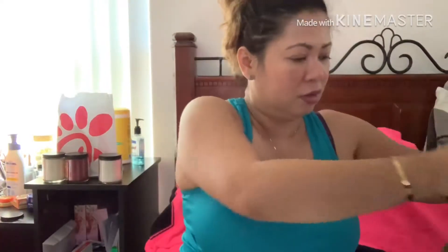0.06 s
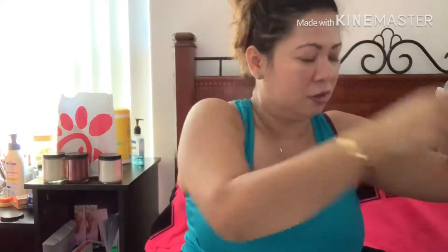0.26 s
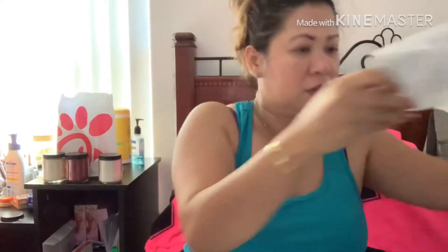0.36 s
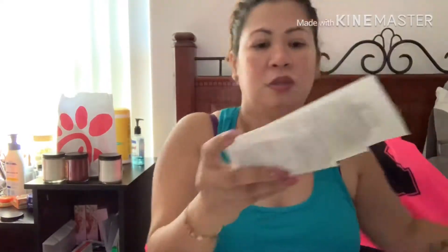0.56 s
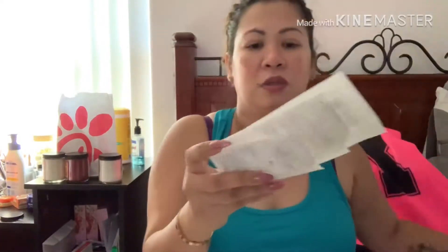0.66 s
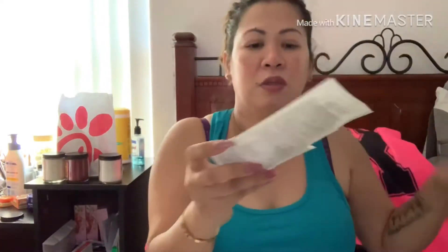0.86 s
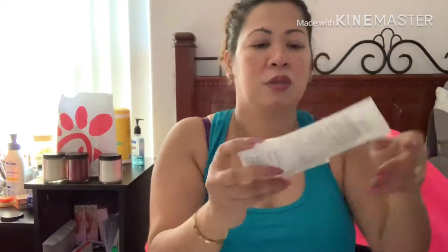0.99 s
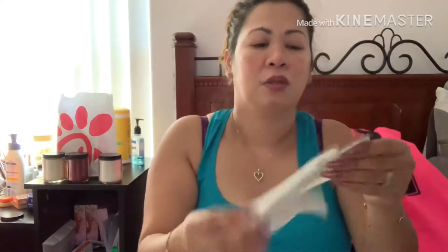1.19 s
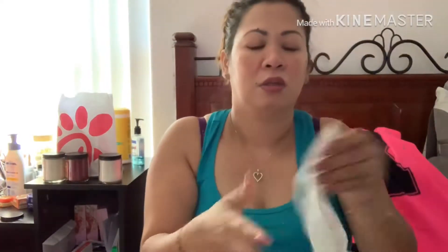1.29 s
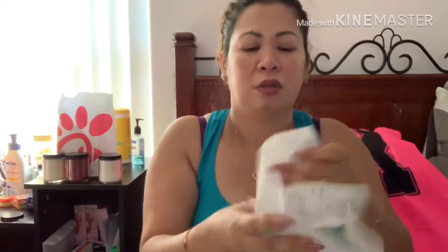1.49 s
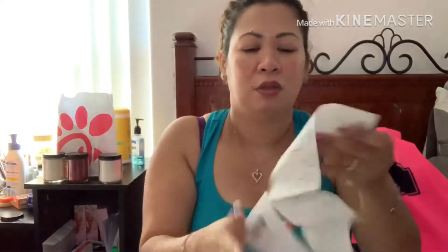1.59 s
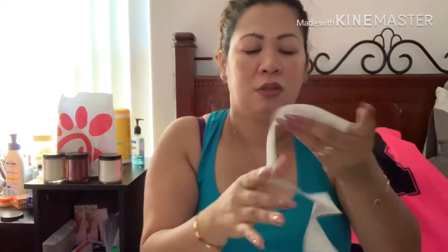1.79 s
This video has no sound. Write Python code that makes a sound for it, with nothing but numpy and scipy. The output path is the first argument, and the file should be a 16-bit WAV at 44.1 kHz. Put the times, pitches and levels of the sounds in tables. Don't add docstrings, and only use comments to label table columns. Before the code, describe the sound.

Paper crinkling, close in a small bedroom. Faint edge ticks open, then at 0.2-0.35 s stiff packing paper crackles loudly with a hollow box boom. Smaller creases and rustles follow from 0.5 to 0.85 s. After a lull around 1 s, a thin sheet unfolds, brighter and sparser, with sharp snaps near 1.5-1.56 s, then fading. Soft bedding bumps and low fan hum lie beneath; short room reflections.

```python
import sys
import numpy as np
from scipy import signal
from scipy.fft import rfft, irfft, next_fast_len
from scipy.io import wavfile
from scipy.ndimage import uniform_filter1d, map_coordinates

SR = 44100
rng = np.random.default_rng(int(sys.argv[2]) if len(sys.argv) > 2 else 0)


def to_wav(s):
    ch = np.atleast_2d(s).T
    pcm = np.round(np.clip(ch, -1, 1) * 32767)
    wavfile.write(sys.argv[1], SR, pcm.astype(np.int16))


def amplitude_ratio(level_db):
    exponent = np.asarray(level_db, float) / 20
    return 10 ** exponent


N = 81585


def unit(x):
    return x / np.sqrt(np.mean(x ** 2) + 1e-20)


def along(points, hz):
    f, v = np.transpose(points)
    return np.interp(np.log(hz + 1), np.log(f + 1), v)


def wobble(rate):
    knots = rng.standard_normal(int(N * rate / SR) + 4)
    return map_coordinates(knots, [np.arange(N) * rate / SR])


def filtered(x, response):
    m = next_fast_len(x.shape[-1] + 8192)
    spectrum = rfft(x, m) * response(np.fft.rfftfreq(m, 1 / SR))
    return irfft(spectrum, m)[..., :x.shape[-1]]


def peak(f, hz, width):
    return 1j * f * width / (hz * hz - f * f + 1j * f * width + 1e-9)


def evened(x, width_hz):
    z = rfft(x)
    bins = int(width_hz * x.shape[-1] / SR) + 1
    smooth_power = uniform_filter1d(np.abs(z) ** 2, size=bins)
    return irfft(z / np.sqrt(smooth_power + 1e-20), x.shape[-1])


def creases(table, rise_s):
    lead_in_s, lead_in_db = .003, -30
    spike_db = 4
    wide, wide_hz = 0.49, 1500
    flap, flap_db, flap_lag = .4, -5, 2.5
    out, ahead = np.zeros(N + SR), SR // 50
    t = np.arange(-ahead, SR // 8) / SR
    after = np.maximum(t, 0)
    for s, db, hz, t60, crack_db in table:
        scatter = uniform_filter1d(rng.standard_normal(len(t)), size=9) * 1.5
        clicks = rng.standard_normal(len(t)) * amplitude_ratio(spike_db * scatter)
        shape = amplitude_ratio(-60 * after / max(t60, .002)) * (1 - np.exp(-after / rise_s))
        buckling = evened(clicks * shape, 500) * np.linalg.norm(clicks * shape)
        lead_in = clicks * amplitude_ratio(lead_in_db) * np.exp(-np.abs(t) / lead_in_s)
        give = np.where(t > 0, buckling, lead_in)

        def ring(f):
            sheet = peak(f, hz, wide * np.sqrt(hz * wide_hz))
            late = np.exp(-2j * np.pi * f * flap_lag / hz)
            panel = amplitude_ratio(flap_db) * late * peak(f, flap * hz, flap * hz / 2)
            crack = amplitude_ratio(crack_db) * peak(f, 2800, 22300)
            return sheet - panel + crack

        burst = filtered(give, ring)
        out[round(s * SR):][:len(t)] += amplitude_ratio(db) * burst / np.abs(burst).max()
    return out[ahead:ahead + N]


def packing_paper():
    # t/s, peak level/dB, sheet pitch f/Hz, t60/s, crack level/dB
    packing = [(.219,-20,1350,0.013,-19),(.231,-26.5,1224,.02,-21),(.243,-16,1730,0.018,-13),(.2475,-18,1500,0.039,-13.5),(.265,-24,2500,0.015,-18),(.278,-8,1290,0.031,-12),(.285,-7,1860,0.026,-5),(.29,-4.5,1255,0.0085,-13),(.295,-19.5,1160,0.033,-28),(.302,-13.5,1420,0.02,10),(.312,-33,2020,0.018,5),(.325,-31,1500,0.026,-8),
               (.344,-29.5,2700,0.032,-22),(.376,-24.5,2340,0.031,-9),(.506,-20.5,1520,0.024,-16),(.515,-26.5,1800,0.068,-10),(.533,-31.5,1800,0.058,1),(.548,-45,1350,0.033,-19),(.5605,-23.5,1610,0.025,-51),(.567,-31,1070,0.013,-33),
               (.598,-36.5,1730,0.02,-34),(.612,-34,6500,0.027,-8),(.638,-33,2500,.03,-13),(.65,-27.5,1580,0.014,-31),(.669,-23,1890,0.025,-20),(.683,-28.5,1940,0.097,-16),
               (.7,-38,1170,0.051,12),(.713,-23.5,1610,0.12,-19),(.722,-17.5,1170,0.018,-17),(.733,-27,1960,0.046,-18),(.748,-40,1500,0.056,-10),
               (.7697,-22,1500,0.024,-24.5),(.787,-26.5,1060,0.025,-22),(.811,-20,6160,0.016,-25),(.8115,-29,1950,0.0086,-22),(.818,-21.5,2660,0.021,-23),(.827,-27,1440,0.012,-35),(.843,-49,1500,0.12,-12)]
    return creases(packing, .0013)


def box_boom(snaps):
    # f/Hz, width/Hz, level/dB
    cavity = [(123, 140, 2.5), (227.5, 39, 11), (285, 24, 6), (487, 89, 6)]
    boom_db = 9.5

    def modes(f):
        return sum((-1) ** k * amplitude_ratio(db) * peak(f, hz, width) for k, (hz, width, db) in enumerate(cavity))

    return amplitude_ratio(boom_db) * filtered(snaps, modes)


def loose_edges():
    # t/s, peak level/dB, sheet pitch f/Hz, t60/s, crack level/dB
    edge_ticks = [(0.0064, -36.5, 3230, 0.0035, 4), (0.0203, -29.5, 2320, 0.018, -8),
                  (0.0362, -36, 2290, 0.0083, -18), (0.0482, -28, 8300, 0.006, -15),
                  (0.0585, -37, 2090, 0.015, 23), (0.0691, -29, 7100, 0.02, -13),
                  (0.0833, -22, 13200, 0.013, -50), (0.2142, -24, 1780, 0.028, -5),
                  (0.268, -8, 9600, 0.051, -7), (0.4397, -29, 2590, 0.0037, 29),
                  (0.4946, -30, 1690, 0.0041, 26), (0.855, -28.5, 3450, 0.0048, -4),
                  (0.8758, -31, 2490, 0.011, 13)]
    return creases(edge_ticks, .0007)


def thin_sheet():
    # t/s, peak level/dB, sheet pitch f/Hz, t60/s, crack level/dB
    sheet_folds = [(0.9508, -39.5, 1400, 0.011, -10), (1.0794, -25.5, 6500, 0.0028, -5),
                   (1.1368, -25, 3000, 0.0015, -12), (1.1411, -20.5, 1490, 0.024, -11),
                   (1.1514, -25.5, 2290, 0.0097, 0), (1.1732, -34, 2100, 0.0071, 14),
                   (1.2136, -35, 1610, 0.035, -15), (1.2284, -28, 1460, 0.008, -19.5),
                   (1.2405, -30, 2040, 0.01, -20), (1.2462, -21, 2870, 0.02, 2),
                   (1.2665, -38, 1540, 0.0052, -15), (1.3597, -40, 6240, 0.014, -19),
                   (1.3708, -31.5, 1620, 0.047, 1), (1.4332, -29, 12300, 0.019, 2),
                   (1.4544, -26, 6430, 0.028, 16), (1.5048, -11.5, 5400, 0.008, -11),
                   (1.511, -30, 1330, 0.06, -10), (1.5474, -21.5, 2900, 0.081, -6),
                   (1.5558, -7, 1890, 0.0052, -23), (1.5635, -29, 1980, 0.017, 7),
                   (1.6129, -26.5, 6040, 0.052, -35), (1.6502, -37.5, 1900, 0.024, -9),
                   (1.724, -31.5, 2670, 0.017, -10), (1.743, -38, 4220, 0.014, 7)]
    thin_hz = 300
    return filtered(creases(sheet_folds, .0007), lambda f: (1j * f / (thin_hz + 1j * f)) ** 2)


def grains(spectrum):
    grains_a_second, grain_db, clump_db = 7000, 1.8, 2
    struck = rng.random(N) < grains_a_second / SR
    ticks = struck * rng.standard_normal(N) * amplitude_ratio(grain_db * rng.exponential(size=N))
    clumps = amplitude_ratio(clump_db * (wobble(24.21) + wobble(90)))
    return unit(filtered(ticks * clumps, lambda hz: amplitude_ratio(along(spectrum, hz))))


def rustle():
    # t/s, effort level/dB, weight of the paper moved level/dB
    hands = [(0, -60.5, -2.5), (.1, -73, 10.5), (.19, -67, -22), (0.303, -40, -11), (0.401, -54.5, 3.5),
             (0.483, -65, 5.5), (0.531, -53, 3), (0.741, -50, -4), (.86, -64.5, 7), (.93, -59.5, -6),
             (1.06, -95, 8), (1.16, -57, -6), (1.271, -46.5, -14), (1.342, -59.5, -13), (1.45, -50, -13),
             (1.6, -48, -18), (1.721, -55.5, -16.5), (1.85, -78, 4)]
    # f/Hz, level/dB per Hz
    crisp = [(290, -61), (500, -59), (614, -16), (1090, 2), (5840, 9), (10600, 3.5), (12100, 3.5),
             (15800, 4), (16500, -35)]
    # f/Hz, level/dB per Hz
    heavy = [(71, 1), (120, 8), (393, 6.5), (504, 14.5), (618, 8), (1630, 3), (2640, -5.5), (5000, -48),
             (6500, -57), (11000, -120)]
    crisp_db, heavy_db = 3.5, 7
    s, effort, weight = np.transpose(hands)
    t = np.arange(N) / SR
    effort_db, weight_db = np.interp(t, s, effort), np.interp(t, s, weight)
    fine = amplitude_ratio(crisp_db) * grains(crisp)
    stiff = amplitude_ratio(heavy_db + weight_db) * grains(heavy)
    return amplitude_ratio(effort_db) * (fine + stiff)


def bumps():
    # t/s, peak level/dB, pitch f/Hz
    thuds = [(0.04, -45.5, 61.6), (0.068, -37, 255), (0.238, -27, 213), (0.285, -22.5, 126),
             (.246, -32, 280), (.51, -61, 398), (0.567, -29, 486), (.7225, -24, 527), (1.142, -36, 640),
             (1.5572, -20.5, 718), (0.725, -33, 92), (0.743, -42, 236), (0.834, -39, 93),
             (1.024, -42.5, 148), (1.234, -41, 131), (1.373, -42.5, 105), (1.772, -51, 170)]
    cycles = 2.37
    out = np.zeros(N + SR)
    for s, db, hz in thuds:
        u = np.arange(int(cycles * 3 * SR / hz)) * hz / SR / cycles
        swell = 3 * u * np.exp(1 - 3 * u)
        out[round(s * SR):][:len(u)] += amplitude_ratio(db) * swell * np.sin(2 * np.pi * cycles * u * (1 - 0.01 * u))
    return out[:N]


def placed(x, lead_s, pan_db, shadow_db):
    # f/Hz, side level/dB
    shadow = [(300, -21), (1500, -40), (3000, -10.5), (8000, -5), (15000, 7.5)]
    shadow_s = .00013
    blur_hz = 2000
    ports = np.array([[1], [-1]])

    def reach(hz):
        lead = np.exp(1j * np.pi * hz * lead_s * ports / np.hypot(1, hz / blur_hz))
        differ = amplitude_ratio(along(shadow, hz) + shadow_db) * np.exp(-2j * np.pi * hz * shadow_s) * 1j
        return lead + ports * differ

    return filtered(x * amplitude_ratio(pan_db / 2 * ports), reach)


def spread(pair):
    # f/Hz, left-right likeness
    alike = [(100, 0.95), (400, 0.65), (1500, 0.25), (4000, 0.012)]

    def turned(hz):
        turn = np.arccos(np.clip(along(alike, hz), -1, 1)) / 2
        return np.array([np.cos(turn), np.sin(turn)])

    mid, side = filtered(pair, turned)
    return np.array([mid + side, mid - side])


def room(x):
    # f/Hz, t60/s
    decay = [(200, 0.195), (2000, 0.15), (10000, 0.16)]
    tail_db, wall_s, wall_db = -7.5, .0085, -13
    out, step = np.zeros((2, N + SR)), SR // 5
    fade = amplitude_ratio(-60 * np.arange(SR // 3) / SR / 0.18)
    for k in range(0, N, step):
        noise = evened(rng.standard_normal((2, SR // 3)) * fade, 138)
        hz, t, z = signal.stft(noise, SR, nperseg=256)
        z = z * amplitude_ratio(-60 * t * (1 / along(decay, hz)[:, None] - 1 / 0.178))
        tail = signal.istft(z, SR, nperseg=256)[1]
        wet = signal.fftconvolve(x[None, k:k + step], tail / np.linalg.norm(tail[0]), axes=1)
        out[:, k + 130:k + 130 + wet.shape[1]] += wet
    wall = np.pad(x, (round(wall_s * SR), 0))[:N]
    return amplitude_ratio(tail_db) * spread(out[:, :N]) + amplitude_ratio(wall_db) * wall


def air():
    # f/Hz, level/dB per Hz
    tone_color = [(20, -9), (40, -2), (200, -6.5), (330, -14), (500, -10.5), (900, -20), (5000, -27),
                  (16500, -37.5)]
    # f/Hz, width/Hz, level/dB
    fan = [(69, 42, -63), (155.8, 110, -53.5), (309, 270, -65.5)]
    # f/Hz, level/dB
    motor = [(182, -67), (392, -71), (441, -66)]
    tone_db, swell_db = -54.5, 1.5
    tone = unit(filtered(spread(rng.standard_normal((2, N))), lambda hz: amplitude_ratio(along(tone_color, hz))))
    hums = np.zeros(N)
    for hz, width, db in fan:
        rumble = unit(filtered(rng.standard_normal(N), lambda f: peak(f, hz, width) ** 2))
        hums += amplitude_ratio(db + swell_db * wobble(7.24)) * rumble
    for hz, db in motor:
        phase = 2 * np.pi * np.cumsum(hz + 2 * wobble(8)) / SR
        hums += amplitude_ratio(db + 2 * wobble(3)) * np.sin(phase)
    return amplitude_ratio(tone_db + 0.54 * wobble(7.0)) * tone + hums


def scene():
    box_out_s = 0.94
    sheet_dry_db = -2
    inside = 1 / (1 + np.exp((np.arange(N) / SR - box_out_s) / .02))
    bed, snaps = rustle(), packing_paper()
    boxed = loose_edges() + snaps + box_boom(snaps) + inside * bed
    front = thin_sheet() + (1 - inside) * bed
    direct = placed(boxed, .00015, -.5, -12) + placed(front, 0, -1.2, 0)
    return direct + room(boxed + amplitude_ratio(sheet_dry_db) * front) + bumps() + air()


def starved(x):
    # from f/Hz, to f/Hz, share of frames, part (0 mid, 1 side)
    weak_bands = [(10100, 11000, .35, 0), (13700, 15000, .55, 0), (15900, 16800, .88, 0),
                  (11900, 12900, .6, 1), (15300, 16800, .8, 1)]
    # f/Hz, level/dB
    side_comb = [(5000, 0), (7000, 2), (9000, -3), (10500, 5), (12400, -9), (14200, 4), (15200, 2),
                 (15700, -10)]
    hz, _, z = signal.stft(np.array([x[0] + x[1], x[0] - x[1]]) / 2, SR, nperseg=1024)
    z[1] *= amplitude_ratio(along(side_comb, hz))[:, None]
    power = np.abs(z) ** 2
    whole = power[:, hz > 1000].sum((0, 1))
    for lo, hi, share, part in weak_bands:
        band = (hz > lo) & (hz < hi)
        margin = np.log(power[part, band].sum(0) ** 0.83 / whole + 1e-30)
        margin = uniform_filter1d(margin, size=2)
        margin = margin - .9 * uniform_filter1d(margin, size=15)
        z[part, band] *= margin > np.quantile(margin, share)
    mid, side = signal.istft(z, SR, nperseg=1024)[1][:, :N]
    return np.array([mid + side, mid - side])


def band_limit(x):
    return signal.sosfilt(signal.butter(12, 16800, fs=SR, output="sos"), x)


def record(dry):
    # f/Hz, level/dB
    mic = [(60, 1.5), (3000, 1), (7000, -1), (9000, -0.5), (10500, -4.5), (12500, 5), (14200, -10.5),
           (15700, 0.5)]
    ceiling = .6
    top_hz, top_db, end_hz = 15900, -12, 16700

    def color(hz):
        return amplitude_ratio(along(mic, hz)) * amplitude_ratio(top_db * (hz > top_hz)) * (hz < end_hz)

    mix = starved(filtered(ceiling * np.tanh(dry / ceiling), color))
    return band_limit(mix)


dry = scene()
out = record(dry)
to_wav(out)
```